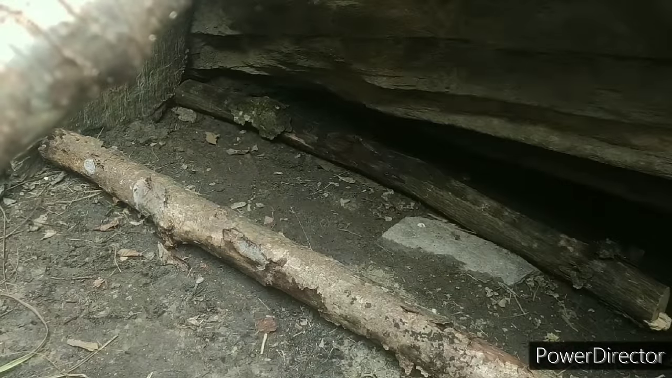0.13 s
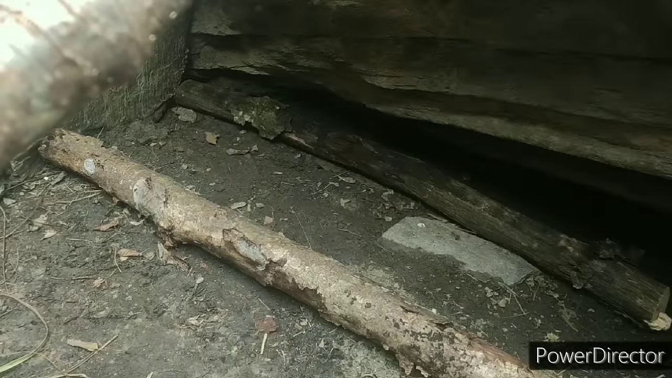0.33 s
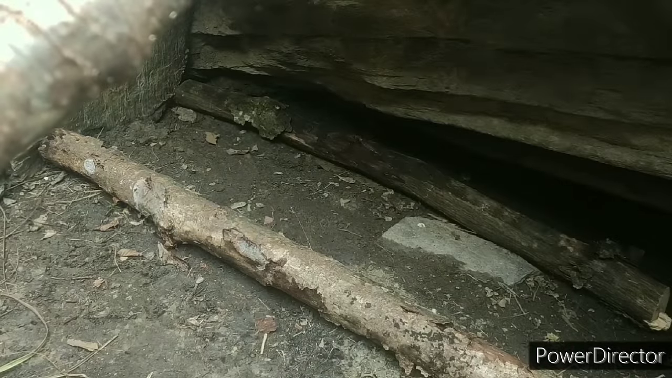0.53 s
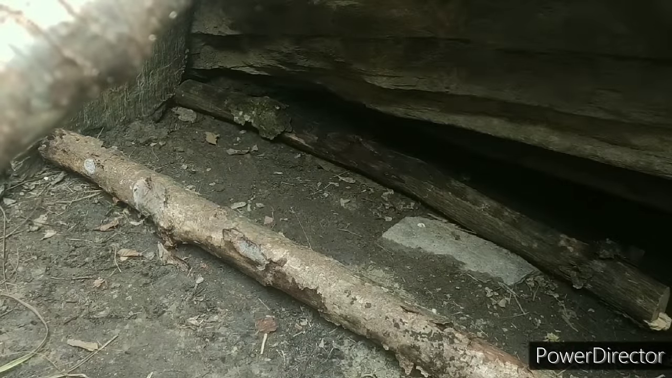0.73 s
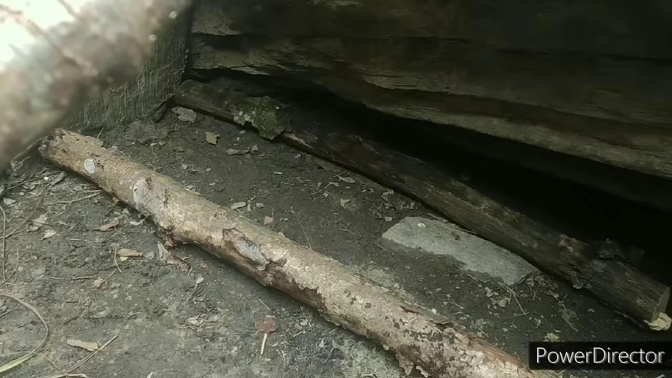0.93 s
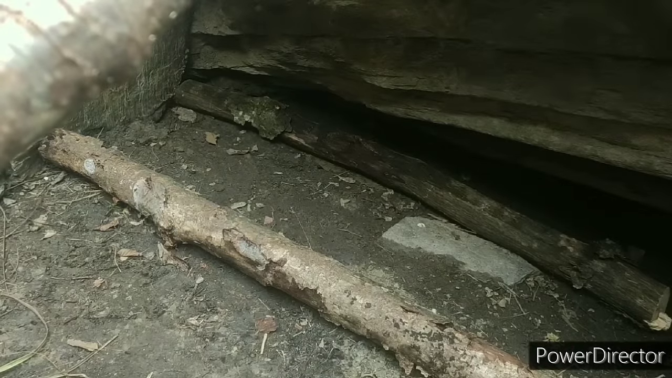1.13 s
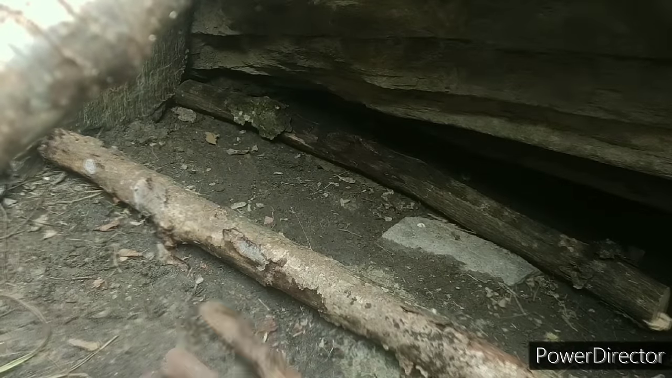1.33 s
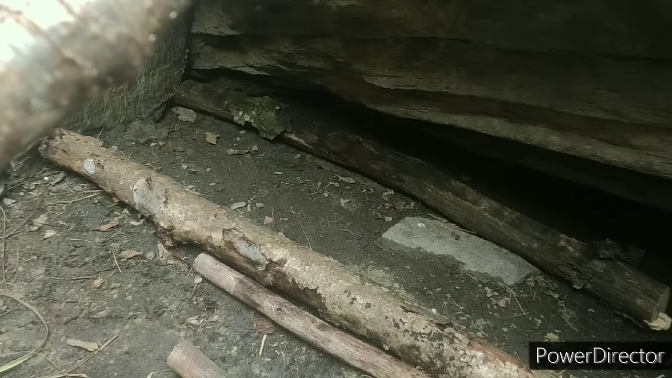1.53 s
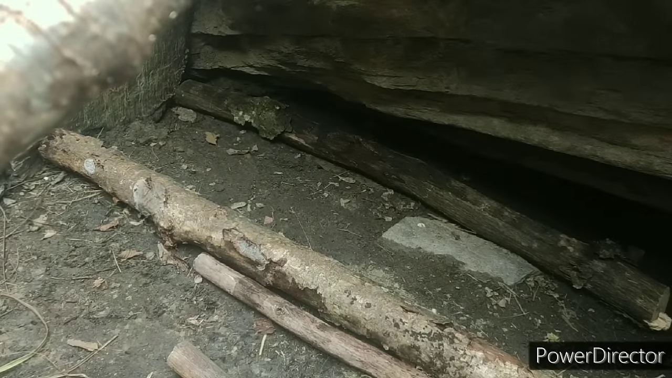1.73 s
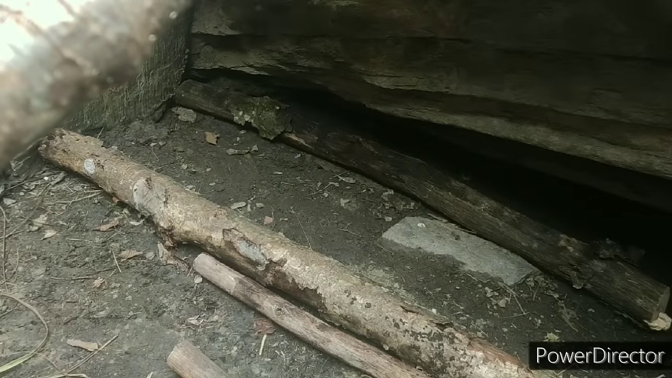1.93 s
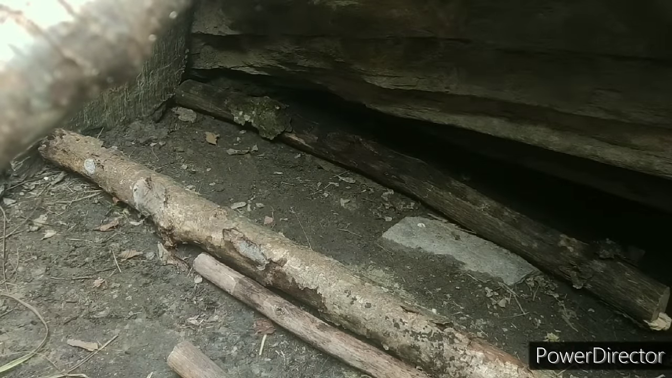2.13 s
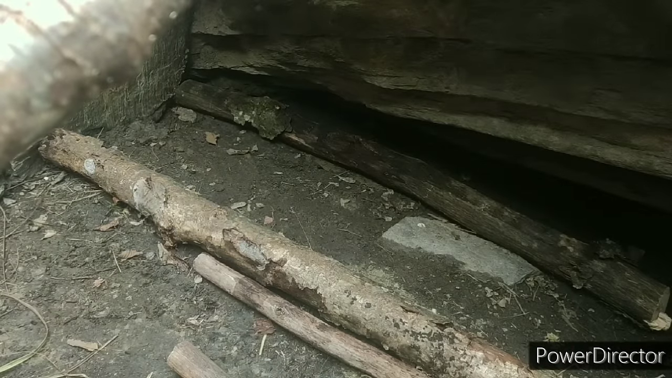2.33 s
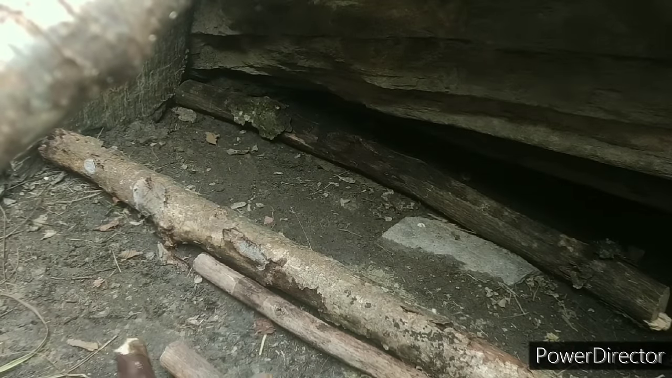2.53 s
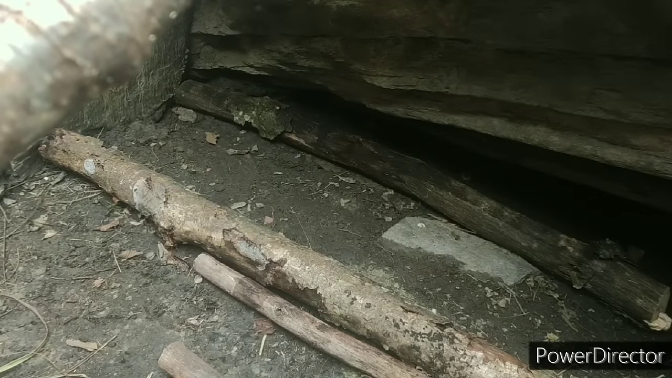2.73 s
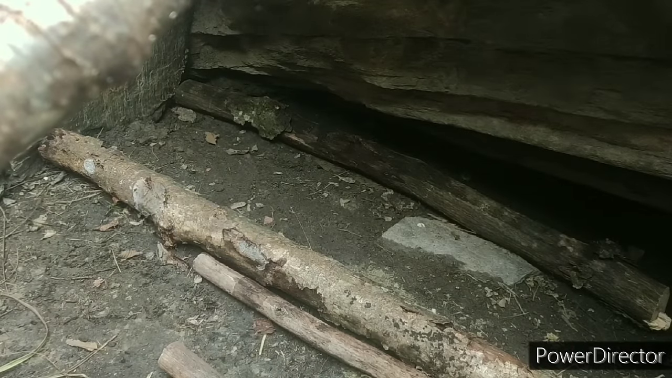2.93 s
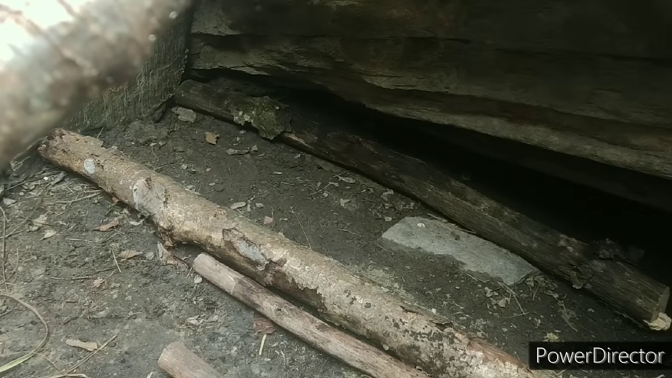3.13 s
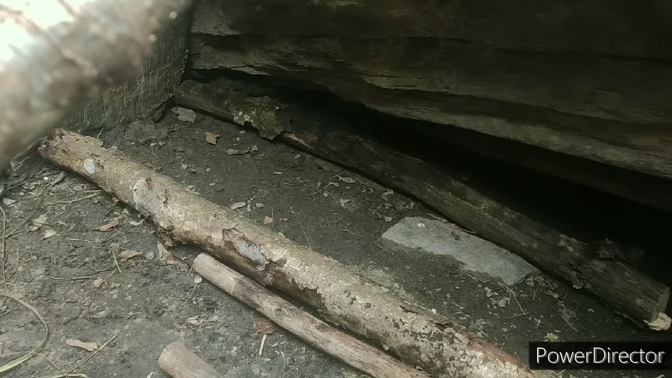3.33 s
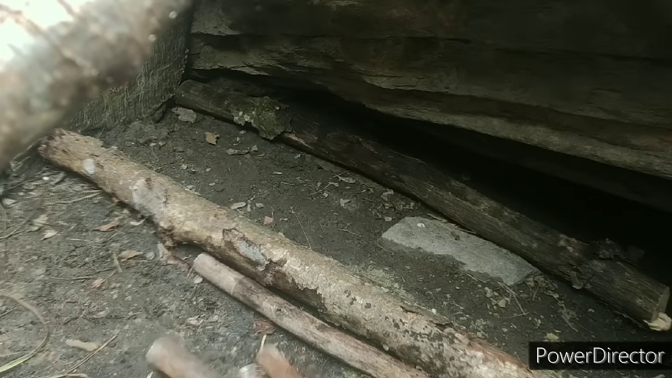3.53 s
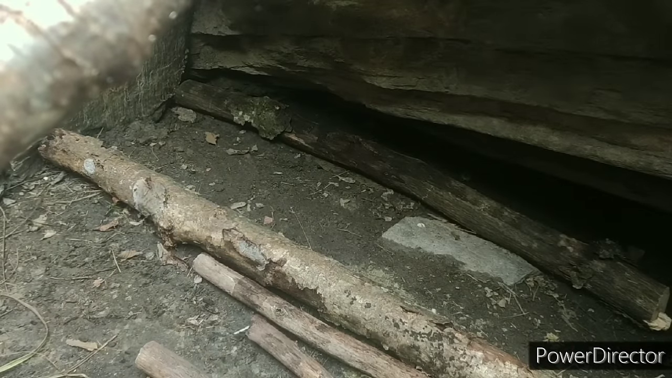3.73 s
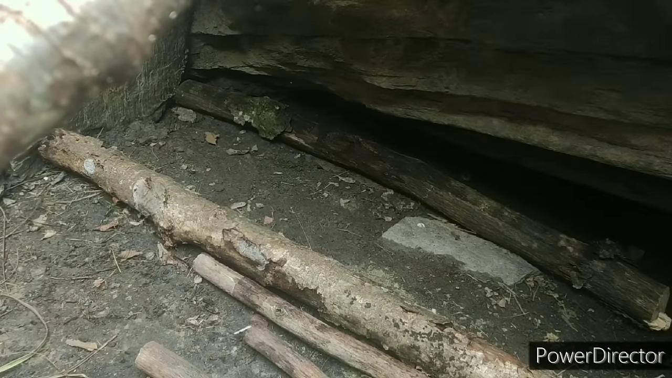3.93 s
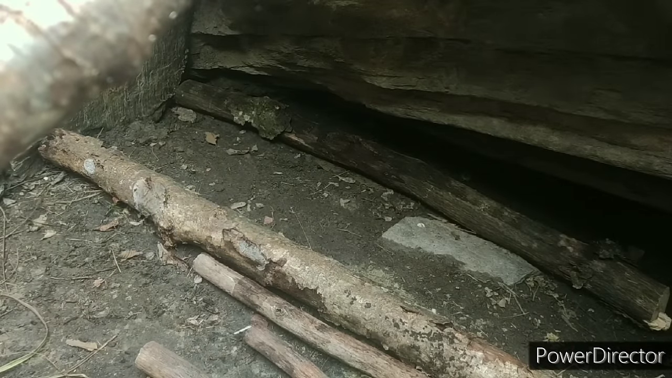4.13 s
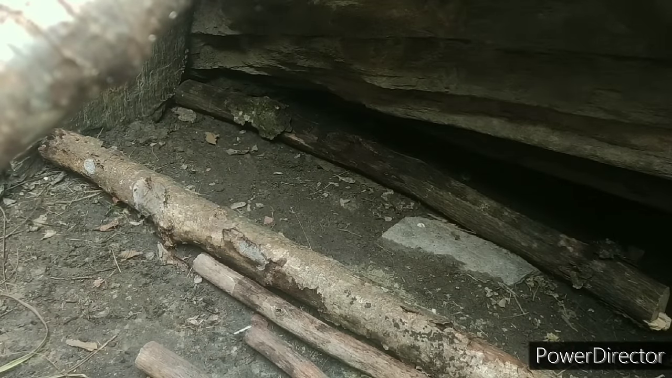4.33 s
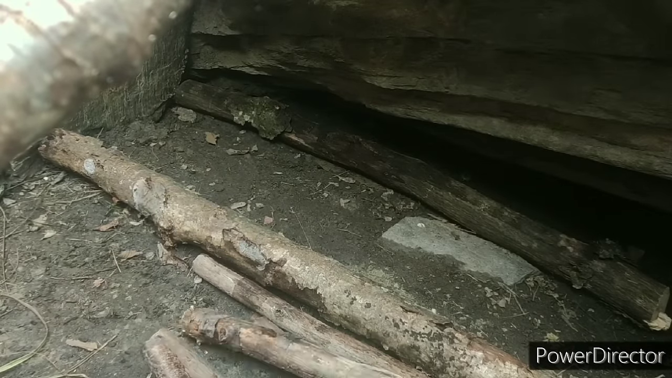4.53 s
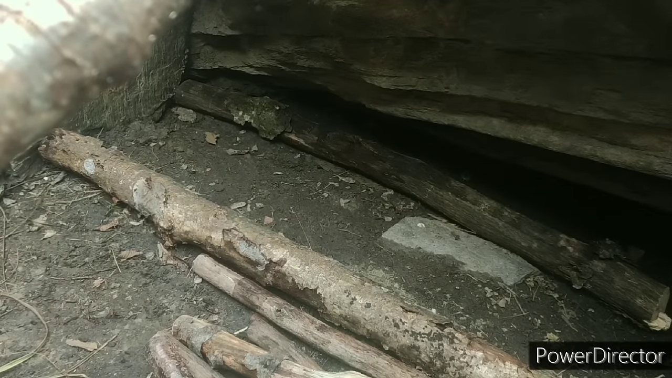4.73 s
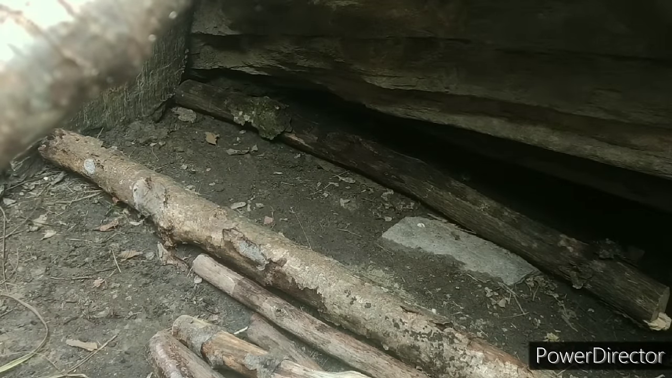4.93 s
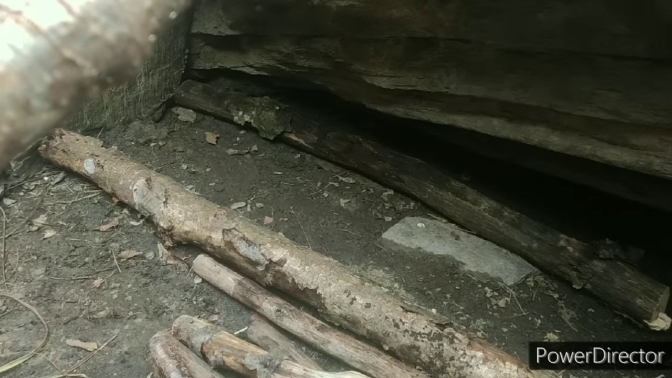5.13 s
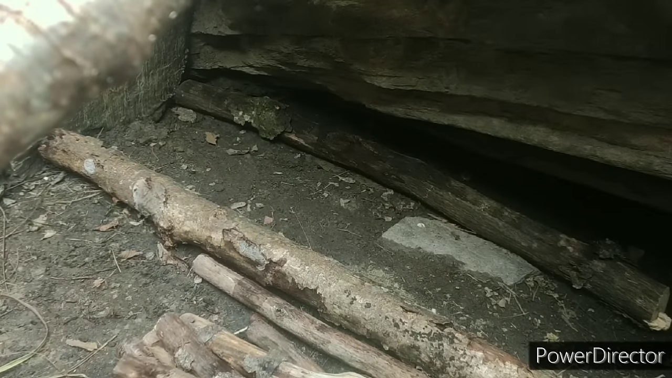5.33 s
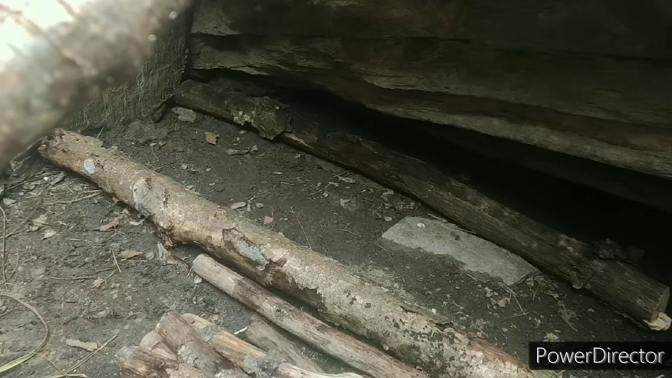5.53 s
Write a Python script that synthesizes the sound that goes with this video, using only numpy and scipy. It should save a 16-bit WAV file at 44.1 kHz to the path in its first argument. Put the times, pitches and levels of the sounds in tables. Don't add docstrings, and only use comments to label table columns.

```python
import sys
import numpy as np
from scipy import signal
from scipy.fft import rfft, irfft, next_fast_len
from scipy.io import wavfile
from scipy.ndimage import uniform_filter1d, map_coordinates

SR = 44100
rng = np.random.default_rng(int(sys.argv[2]) if len(sys.argv) > 2 else 0)


def voltage_ratio(level):
    return 10 ** (np.asarray(level, float) / 20)


def store_pcm(level_fs):
    pcm = np.round(np.clip(level_fs, -1, 1) * 32767).astype(np.int16)
    wavfile.write(sys.argv[1], SR, np.atleast_2d(pcm).T)


N = 250488


def unit(x):
    return x / np.sqrt(np.mean(x ** 2) + 1e-20)


def along(points, hz):
    point_hz, value = np.transpose(points)
    return np.interp(np.log(hz + 1), np.log(point_hz + 1), value)


def wobble(knots_per_s):
    knots = rng.standard_normal(int(N * knots_per_s / SR) + 4)
    return map_coordinates(knots, [np.arange(N) * knots_per_s / SR])


def filtered(x, response):
    size = next_fast_len(N + SR // 2)
    spectrum = rfft(x, size) * response(np.fft.rfftfreq(size, 1 / SR))
    return irfft(spectrum, size)[..., :N]


def pair_noise(spectrum, alike):
    def shape(hz):
        turn = np.arccos(np.clip(along(alike, hz), -1, 1)) / 2
        return voltage_ratio(along(spectrum, hz)) * [np.cos(turn), np.sin(turn)]

    mid, side = filtered(rng.standard_normal((2, N)), shape)
    return unit(np.array([mid + side, mid - side]))


def leaning(x, lean):
    return filtered(x, lambda hz: voltage_ratio(along(lean, hz) * [[0.5], [-0.5]]))


# (time [s], level [dB])
HISS_LEVEL = [(0, -34), (.55, -34.5), (.95, -33), (1.4, -34.5), (1.8, -33.5), (2.2, -34), (2.7, -32),
              (3.6, -34), (5.2, -34), (5.7, -35.5)]
# (frequency [Hz], density [dB per Hz])
HISS_SPECTRUM = [(12, -44), (20, -14), (42, -11), (120, -0.5), (163, -4), (227, -8), (363, -5.5), (429, -8),
                 (581, -7.5), (766, -9), (1160, -8.5), (2440, -12.5), (3590, -16.5), (14700, -23.5)]
# (frequency [Hz], left-right likeness [-1..1])
ALIKE = [(60, 0.93), (150, 0.98), (380, 0.97), (950, 0.9), (2380, 0.14), (5980, -0.092), (15000, -0.01)]
# (frequency [Hz], left minus right [dB])
FAR_LEAN = [(60, 4), (180, 2.5), (550, 1.5), (1650, 2), (4970, 1.5), (15000, 0.5)]


def hiss():
    level_db = np.interp(np.arange(N) / SR, *np.transpose(HISS_LEVEL))
    level_db = level_db + 0.72 * wobble(2.176) + 0.13 * wobble(12)
    return voltage_ratio(level_db) * unit(leaning(pair_noise(HISS_SPECTRUM, ALIKE), FAR_LEAN))


# (time [s], level [dB])
TICKS = [
    (.595, -37),
    (.610, -36),
    (.627, -49),
]


def insect(pitch_hz=11300, width_s=0.0044, port_phase_rad=1.3):
    t = np.arange(N) / SR
    shape = sum(voltage_ratio(db) * np.exp(-((t - s - 0.005) / width_s) ** 2) for s, db in TICKS)
    return shape * np.sin(2 * np.pi * pitch_hz * t + np.array([[0], [port_phase_rad]]))


# (frequency [Hz], t60 [s])
OVERHANG_T60 = [(300, 0.067), (1500, 0.11), (4000, 0.068), (12000, 0.0078)]


def overhang(x, delay_samples=130):
    hz, t, z = signal.stft(rng.standard_normal((2, SR // 4)), SR, nperseg=128)
    decay = voltage_ratio(-60 * t / along(OVERHANG_T60, hz)[:, None])
    tail = signal.istft(z * decay, SR, nperseg=128)[1]
    tail = tail / np.linalg.norm(tail[0])
    delayed = np.pad(x, ((0, 0), (delay_samples, 0)))
    return signal.fftconvolve(delayed, tail, axes=1)[:, :N]


def add_bursts(track, events, t60_s, rise_s):
    t = np.arange(SR // 4) / SR
    for s, db in events:
        track[round(s * SR):][:len(t)] += voltage_ratio(db - 60 * t / t60_s) * (1 - np.exp(-t / rise_s))
    return track[:N]


# (time [s], level [dB])
THUMPS = [(1.5164, -24), (1.5688, -23), (2.627, -16.5), (2.642, -24), (2.678, -21), (2.7204, -27),
          (2.7744, -28), (2.8285, -36), (2.9087, -23), (3.692, -20), (4.5468, -27), (5.4076, -26),
          (5.433, -21.5)]
# (frequency [Hz], level [dB])
THUMP_SPECTRUM = [(50, -20), (120, 9.5), (200, 1), (400, -30)]


def soil_thumps():
    events = [(s, db - 5.0) for s, db in THUMPS]
    envelope = add_bursts(np.zeros(N + SR), events, t60_s=0.22, rise_s=0.0055)
    return envelope * pair_noise(THUMP_SPECTRUM, [(100, 0.99)])


# (time [s], crack peak [dB], knock [dB])
SCUFFS = [(1.4933, 0.5, 0.5), (1.4956, 0.5, -13), (1.568, -19, -15), (1.575, -20, -17), (1.5843, -35, -15),
          (1.5988, -14, -20), (2.6226, -15.5, -35), (2.626, -24, -15), (2.639, -15.5, -18),
          (2.644, -23, -15), (2.659, -10, -15), (2.6636, -10, -12), (2.678, -20, -27), (2.7213, -22, -15),
          (2.7744, -26, -20), (2.799, -23.5, -16.5), (2.9087, -18.5, -34), (3.6942, -26, -8),
          (3.6978, -8, -12), (3.702, -5.5, -9), (3.7251, -9.5, -12), (3.7573, -19, -13), (4.5464, -4, -4.5),
          (4.5772, -3, -8), (4.5868, -12, -5), (4.6186, -17, -13), (5.408, -6.5, -17), (5.4158, -20, -14),
          (5.433, -8.5, 1), (5.443, -9, -12)]
# (frequency [Hz], level [dB])
CRACK_SPECTRUM = [(2500, -33), (4000, 3), (7000, -1.5), (10000, -0.5), (16000, -9)]
# (frequency [Hz], level [dB])
KNOCK_SPECTRUM = [(200, 0), (380, -8), (600, 7.5), (1200, 4), (2200, -0.5), (3800, -1.5), (5500, -24)]


def scuffs():
    cracks = [(s, crack_db - 4) for s, crack_db, _ in SCUFFS]
    knocks = [(s, knock_db - 13) for s, _, knock_db in SCUFFS]
    crack = add_bursts(np.zeros(N + SR), cracks, t60_s=0.024, rise_s=0.00064)
    knock = add_bursts(np.zeros(N + SR), knocks, t60_s=0.061, rise_s=0.00099)
    grit = voltage_ratio(4.4 * wobble(900))
    bark = crack * unit(grit * pair_noise(CRACK_SPECTRUM, ALIKE))
    return bark + knock * pair_noise(KNOCK_SPECTRUM, [(500, 1.0), (3000, 0.3)])


def wood(rows, port_gap_s=0.00003, settle_s=0.062, rattle_db=3.0, rise_s=0.0004):
    out = np.zeros((2, N + SR))
    t = np.arange(SR // 8) / SR
    chance = rng.standard_normal((len(rows), 42))
    for (s, hz, db, t60_s), (start, skew, *knots) in zip(rows, chance):
        if db < -60:
            continue
        lag = np.pi * hz * port_gap_s * (1 + skew) * np.array([[1], [-1]])
        rattle = rattle_db * map_coordinates(knots, [160 * t]) * np.minimum(t / 0.011, 1)
        level_db = db + rattle - 60 * t / t60_s - 14 * (t / settle_s) ** 2
        shape = voltage_ratio(level_db) * (1 - np.exp(-t / rise_s))
        ring = shape * np.sin(2 * np.pi * hz * t + 0.76 * start + lag)
        out[:, round(s * SR):][:, :len(t)] += ring
    return out[:, :N]


# (time [s], mode [Hz], level [dB], t60 [s])
TAPS = [(2.256, 1580, -28, 0.04), (2.28, 1560, -31, 0.042), (2.327, 1300, -15, 0.02),
        (2.331, 1660, -27, 0.058), (2.91, 3540, -28.5, 0.039), (2.983, 1200, -18, 0.064),
        (2.983, 1920, -24.5, 0.042), (3.595, 980, -22.5, 0.027), (4.035, 1030, -29.5, 0.072),
        (5.18, 850, -26.5, 0.046), (5.312, 877, -24, 0.06)]


def handling_taps():
    return wood(TAPS)


def struck(modes, hits):
    rows = []
    for s, hit_db, favoured_hz, spread_octaves in hits:
        for hz, db, t60_s in modes:
            distance = np.log2(hz / favoured_hz) / spread_octaves
            rows.append((s, hz, db + hit_db - 12 * distance ** 2, t60_s))
    return rows


# (frequency [Hz], level [dB], t60 [s])
FIRST_LOG = [(200, -9, 0.0061), (430, -8, 0.045), (540, -11, 0.049), (670, -4.5, 0.03), (1420, 1, 0.022),
             (1498, -16.5, .08), (1817, -10, 0.038), (2580, 5.5, 0.013), (2760, -6, 0.067),
             (2823, -7, 0.048), (3390, -0.5, 0.015), (3710, -9.5, 0.033), (4430, -5, .015),
             (4830, 0.5, 0.022)]
SECOND_LOG = [(203, -13, 0.027), (372, -17, 0.018), (432, -9.5, 0.075), (628, -16.5, 0.053),
              (712, -13.5, .05), (800, -15.5, 0.032), (1010, -14.5, 0.024), (1260, -29, 0.17),
              (1530, -14, 0.078), (1545, -18.5, .03), (1680, -39, .025), (3370, -17, 0.028),
              (3530, -23, .04), (5630, -25, 0.013)]
THIRD_LOG = [(430, -9, .08), (760, -17, 0.018), (1082, -14, 0.17), (1206, -12, 0.053), (1350, -14, 0.017),
             (1460, -15.5, .06), (1535, 0.5, 0.072), (1650, -16, 0.05), (1990, -12, 0.036),
             (2140, -2.5, 0.015), (2740, -1.5, 0.014), (2800, -8.5, 0.052), (2950, -6.5, 0.078),
             (3290, -12.5, .035)]
FOURTH_LOG = [(434, -17, 0.18), (1047, -12, 0.11), (1076, -8, 0.092), (1525, -3, 0.058),
              (1676, -4.5, 0.028), (1780, -10.5, 0.092), (1910, -15, 0.037), (2200, -1.5, 0.028),
              (2437, -5, 0.042), (2495, -6, 0.067), (2685, -2, .068), (3100, 2, .01), (3440, -15, 0.047),
              (7450, -9, .014)]
FIFTH_LOG = [(247, -12, 0.093), (460, -5.5, 0.0082), (792, -10.5, 0.073), (1091, -21.5, .15),
             (1203, -14, .14), (1473, 7, 0.011), (1600, -18, .035), (1740, -10, 0.033), (2350, 1.5, .013),
             (2620, -13, 0.053), (2860, -10, .03), (2980, -2.5, 0.027), (3600, -18, .056)]
# (time [s], strength [dB], favoured pitch [Hz], spread [octaves])
FIRST_HITS = [(1.4912, -9, 540, 0.26), (1.4935, -2.5, 3100, 0.74), (1.4935, -10, 1450, .3),
              (1.4975, 0.5, 2500, 3.2), (1.5035, -8, 2760, .12), (1.517, -18, 2950, 0.36),
              (1.552, -12, 435, .3), (1.569, -13.5, 620, .3), (1.5765, -13, 3300, .08),
              (1.5785, -23, 2770, .08), (1.5765, -9, 1490, .06), (1.5765, 3.5, 200, 0.88),
              (1.585, -8, 470, .5)]
SECOND_HITS = [(2.623, -14, 3500, .3), (2.633, -10, 660, .4), (2.64, -3.5, 870, 1.6), (2.646, -5, 900, 1.7),
               (2.659, -4, 870, 0.84), (2.6623, 1.5, 3530, .2), (2.664, 1.5, 1100, 2.2),
               (2.672, -3.5, 400, 1.7), (2.672, -1.5, 1540, .2), (2.688, -3, 1320, 0.36),
               (2.72, -12.5, 800, 1.5), (2.721, -11, 3550, .2), (2.736, -18, 800, 1.4),
               (2.772, -6, 203, .4), (2.799, -12, 580, 1.1), (2.826, -6, 230, 0.64)]
THIRD_HITS = [(3.6957, -4, 1320, 0.18), (3.6952, -4, 780, .2), (3.6985, 3.5, 1280, .17),
              (3.6985, 2, 760, .2), (3.6982, -5, 1990, .2), (3.7028, -2, 1570, .3),
              (3.7026, -2, 2680, 0.64), (3.7055, 2.5, 3260, 0.19), (3.7261, -0.5, 2650, 0.72),
              (3.7263, -9, 1520, 0.22), (3.7256, -3.5, 900, 1.18), (3.739, 2, 1173, 0.17),
              (3.7577, -6, 1100, .2), (3.7577, 2, 1460, 0.058), (3.7585, 8, 1680, .08),
              (3.7586, -15.5, 2980, 0.25)]
FOURTH_HITS = [(4.547, 3, 1015, 0.094), (4.5487, 3.5, 1660, 0.08), (4.548, -5, 2340, 0.13),
               (4.5483, -1, 7450, .5), (4.556, -10, 3440, .1), (4.558, -6.5, 1535, 0.15),
               (4.5772, 1.5, 1075, .3), (4.577, -0.5, 2550, 0.64), (4.5768, -4, 434, .3),
               (4.587, -0.5, 1530, .18), (4.586, -0.5, 2495, 0.073), (4.588, -10, 1070, .2),
               (4.587, -3, 3400, .1), (4.6205, 5, 1904, 0.075), (4.625, -3, 1785, .09),
               (4.626, -21, 2410, .1), (4.705, -22, 1780, 0.12)]
FIFTH_HITS = [
    (5.4161, 2.5, 430, 0.72),
    (5.4165, -20, 1450, .4),
    (5.4334, 2, 1500, .4),
    (5.434, 2.5, 2800, 0.56),
    (5.4427, -3.5, 1120, 0.45),
    (5.442, -7, 2550, .6),
    (5.457, -7, 1200, .08),
    (5.497, -4.5, 1090, .12),
    (5.497, -12, 1600, .08),
    (5.52, -11.5, 470, 1.34),
]


def falling_logs():
    logs = [(FIRST_LOG, FIRST_HITS), (SECOND_LOG, SECOND_HITS), (THIRD_LOG, THIRD_HITS),
            (FOURTH_LOG, FOURTH_HITS), (FIFTH_LOG, FIFTH_HITS)]
    return sum(wood(struck(modes, hits)) for modes, hits in logs)


# (frequency [Hz], left minus right [dB])
NEAR_LEAN = [(400, 1.5), (1700, 1.1), (2700, 5), (3400, 7.5), (4500, 2), (6000, 1.2)]


def scene():
    rings = leaning(falling_logs() + handling_taps(), NEAR_LEAN)
    contacts = (scuffs() + soil_thumps()) * voltage_ratio([[0.7], [-0.7]])
    pile = rings + contacts
    return pile + voltage_ratio(-17.0) * overhang(pile) + insect() + hiss()


def gain_control(x, start_db=-20, slope=0.48, back_db_per_s=9.5, react_s=0.047):
    t = np.arange(N) / SR
    size = int(react_s * SR)

    def late_mean(v):
        return uniform_filter1d(v, size, origin=(size - 1) // 2)

    level_db = 10 * np.log10(np.abs(late_mean(np.mean(x ** 2, 0))) + 1e-12)
    cut_db = np.clip(slope * (level_db - start_db), 0, None)
    cut_db = np.maximum.accumulate(cut_db + back_db_per_s * t) - back_db_per_s * t
    return x * voltage_ratio(-late_mean(cut_db))


def ragged_top(x, edge_hz=15650, scatter_hz=420, loud_hz=16200, loud_db=-28, gaps=0.67):
    hz, _, z = signal.stft(x, SR, nperseg=2048)
    loud = np.sqrt(np.sum(np.abs(z) ** 2, (0, 1))) > voltage_ratio(loud_db)
    steps = np.repeat(rng.standard_normal(len(loud)), 2)[:len(loud)]
    edge = np.where(loud, loud_hz, edge_hz - scatter_hz * np.abs(steps) ** 1.5)
    patches = uniform_filter1d(rng.standard_normal(z.shape[1:]), size=9, axis=0)
    patches = unit(uniform_filter1d(patches, size=3, axis=1))
    keep = patches < 1 + gaps * (16500 - hz[:, None]) / 1000
    below_edge = hz[:, None] < edge
    return signal.istft(z * keep * below_edge, SR, nperseg=2048)[1][:, :N]


def roll_off(x):
    return signal.sosfilt(signal.butter(12, 16360, fs=SR, output="sos"), x)


def record(dry):
    x = gain_control(dry)
    x = 0.95 * x / (1 + np.abs(x) ** 6) ** (1 / 6)
    mix = ragged_top(x)
    return roll_off(mix)


dry = scene()
out = record(dry)
store_pcm(out)
```